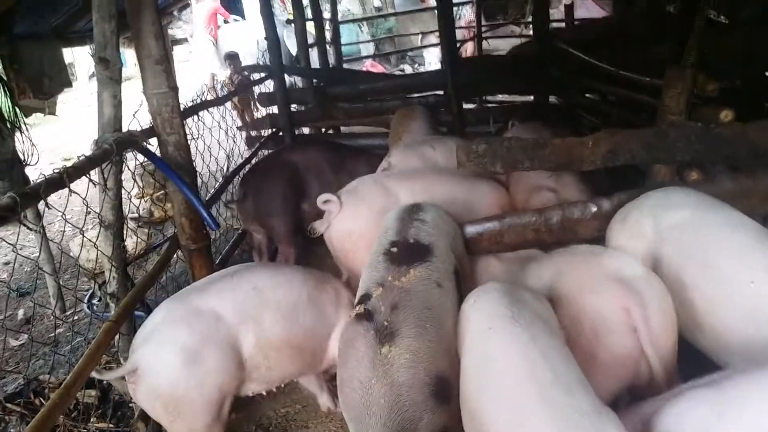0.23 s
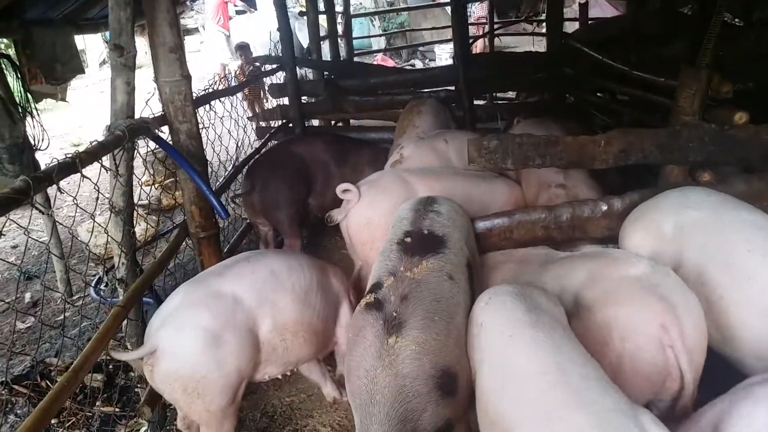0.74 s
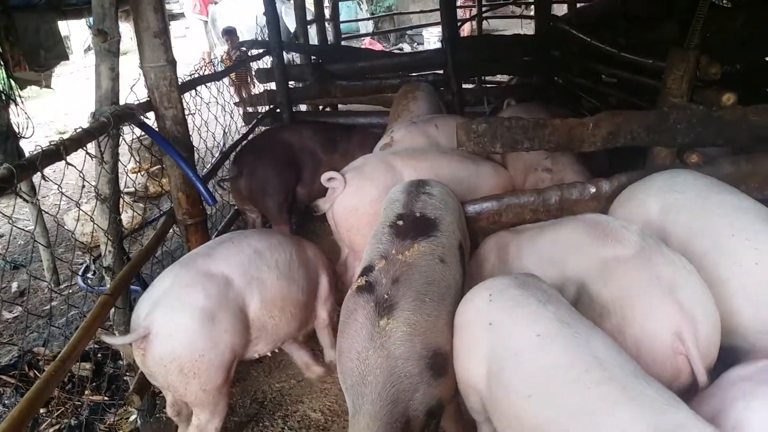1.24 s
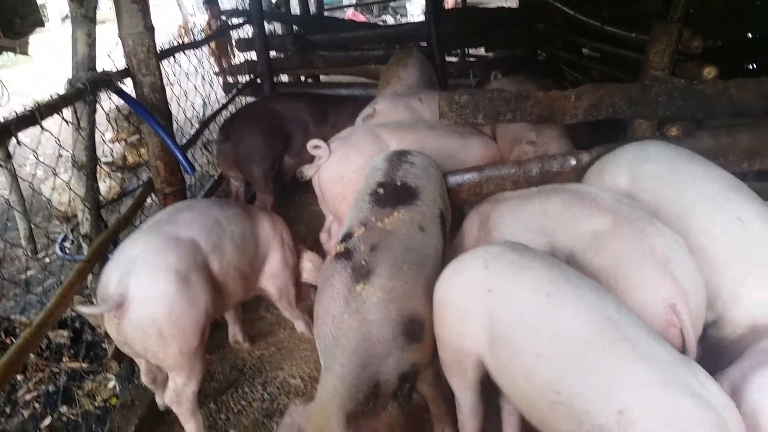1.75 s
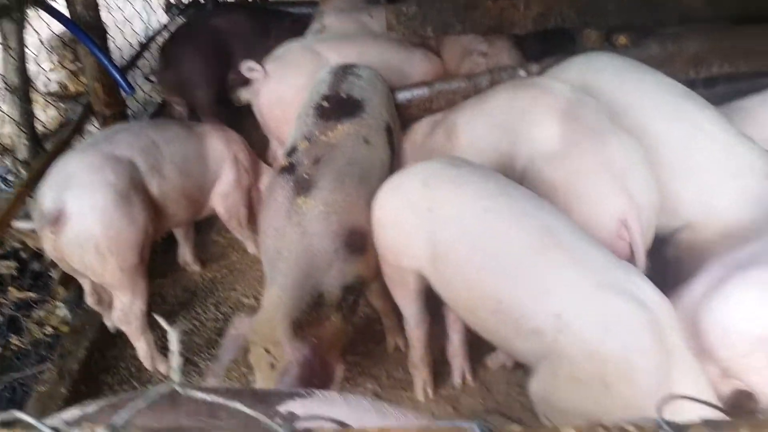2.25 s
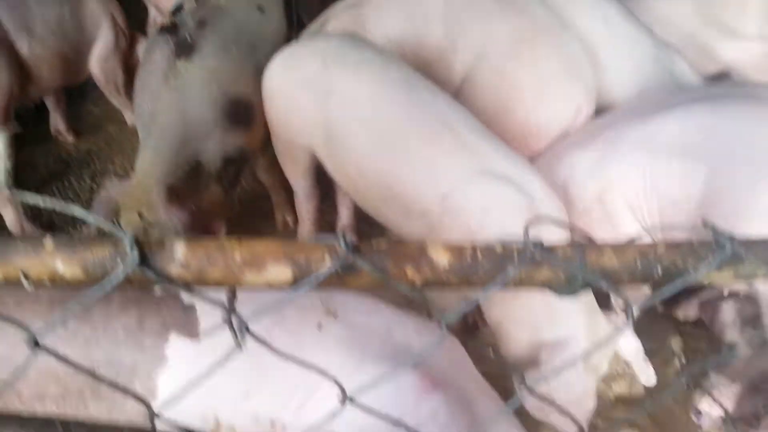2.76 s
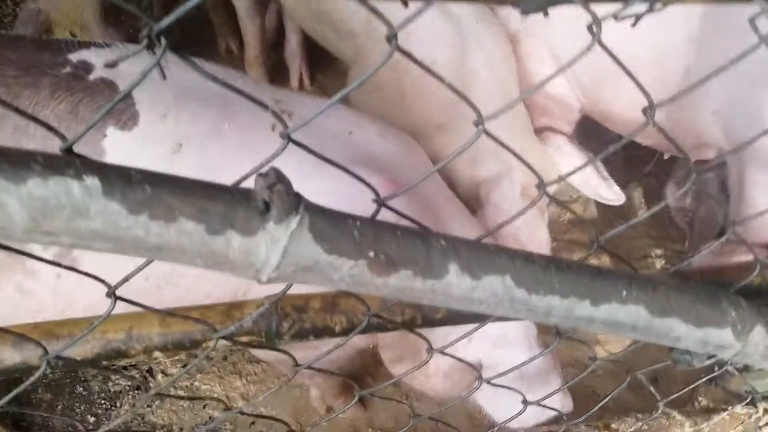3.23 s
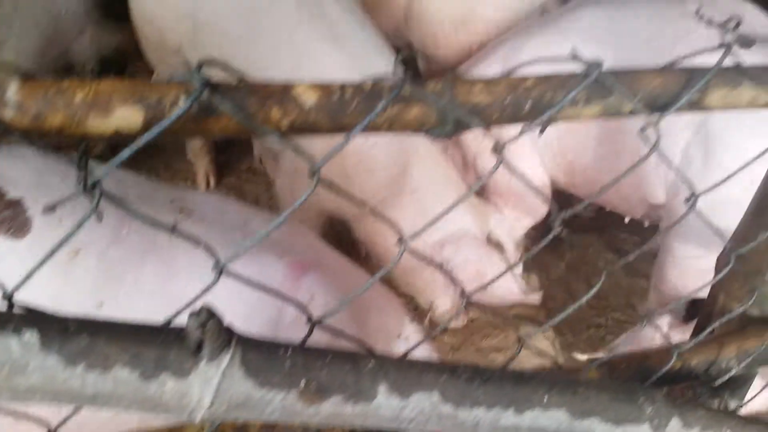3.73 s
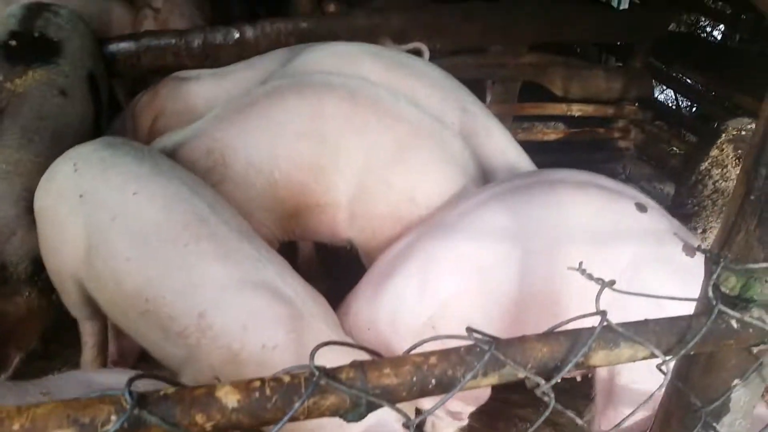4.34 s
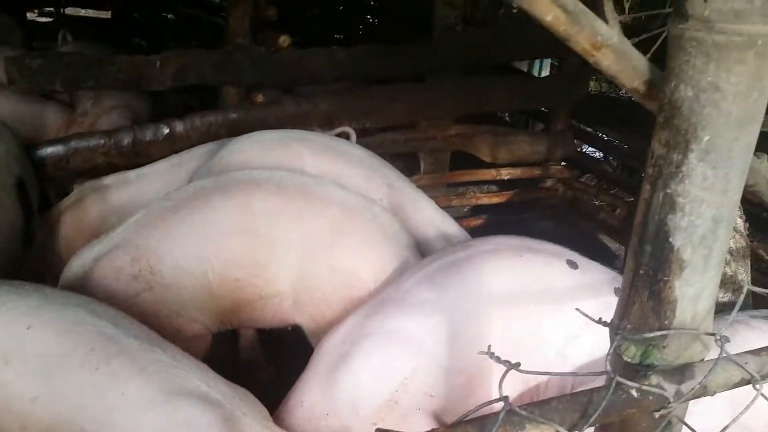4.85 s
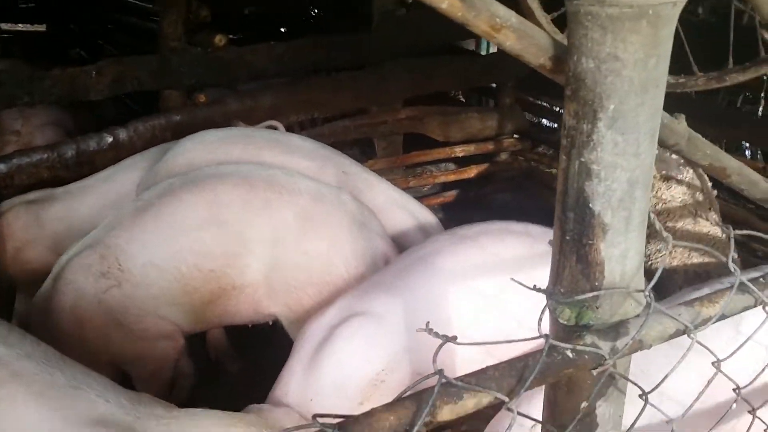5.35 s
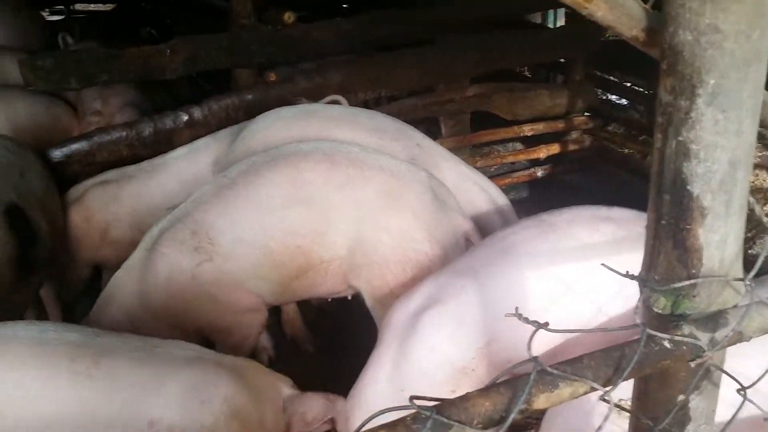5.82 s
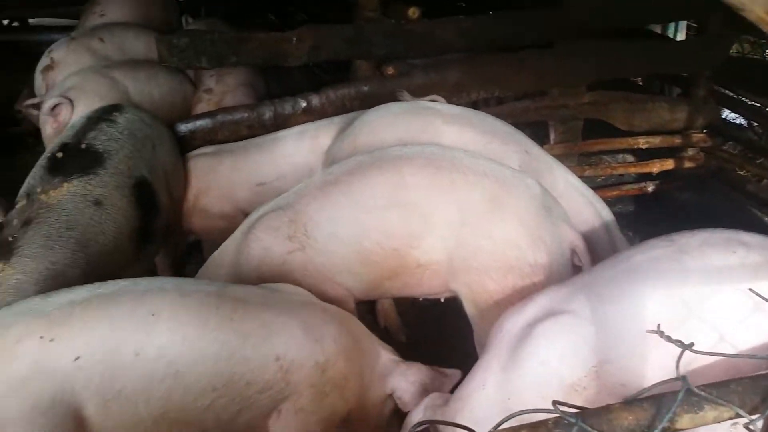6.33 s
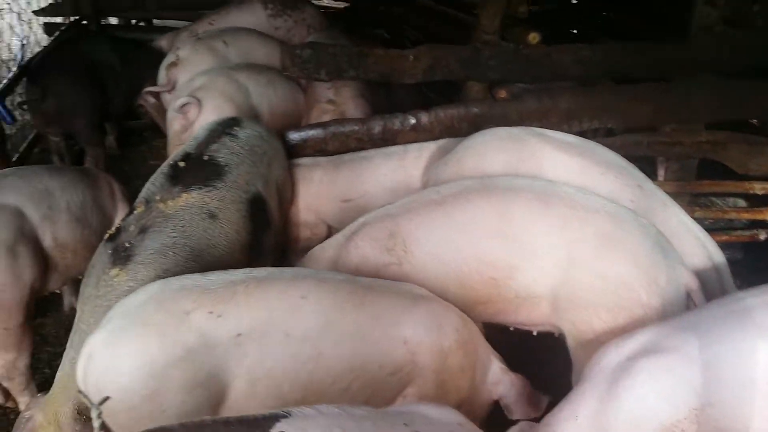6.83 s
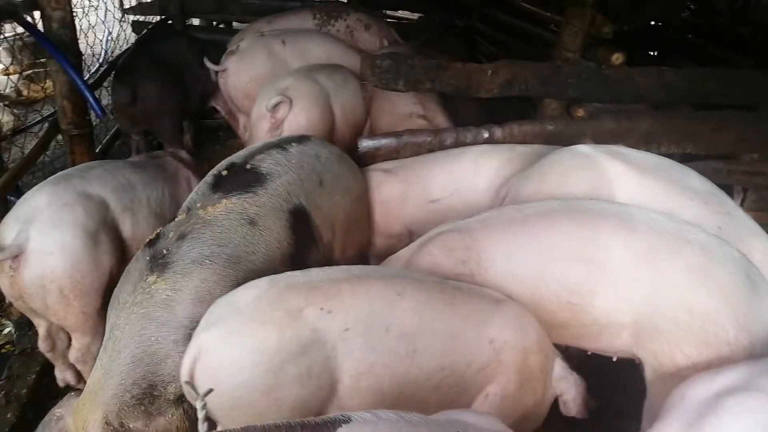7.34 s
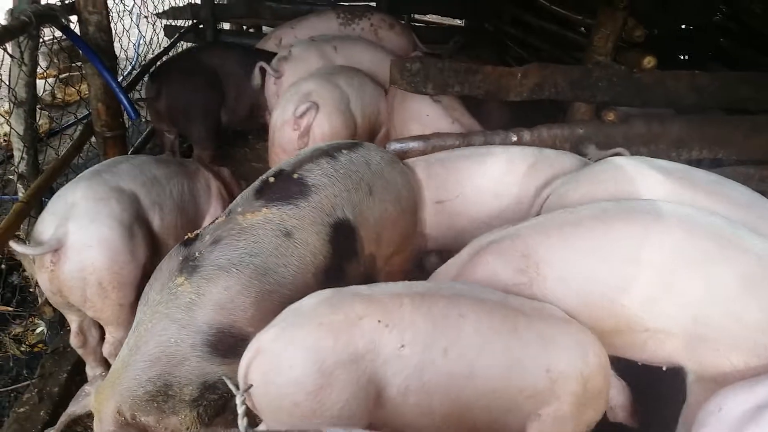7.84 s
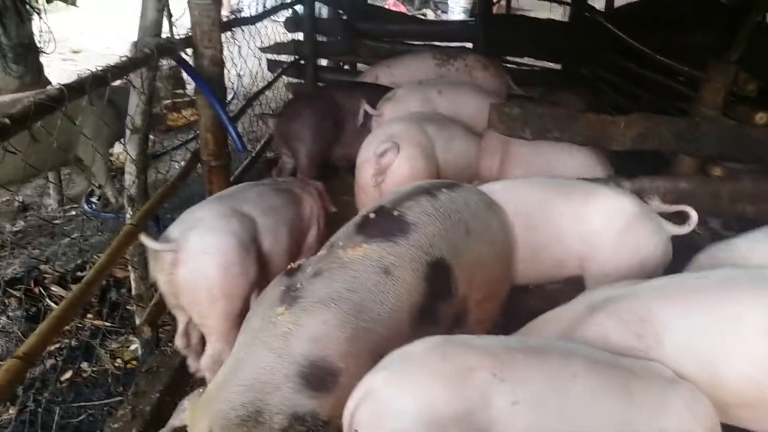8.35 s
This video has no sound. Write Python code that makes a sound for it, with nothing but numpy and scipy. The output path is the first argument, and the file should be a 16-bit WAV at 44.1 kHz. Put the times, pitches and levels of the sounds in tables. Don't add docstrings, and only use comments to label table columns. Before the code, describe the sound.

Pigs crowding a farm pen mutter and chew; a near pig grunts, growls, then squeals harshly, squeals again briefly, and ends with a slack growl.

```python
import sys
import numpy as np
from scipy import signal
from scipy.fft import rfft, irfft, next_fast_len
from scipy.io import wavfile
from scipy.ndimage import uniform_filter1d, map_coordinates

SR = 44100
rng = np.random.default_rng(int(sys.argv[2]) if len(sys.argv) > 2 else 0)


def transcribe(signal):
    frames = np.atleast_2d(signal).T
    limited = np.clip(frames, -1, 1)
    pcm = np.round(limited * 32767).astype(np.int16)
    wavfile.write(sys.argv[1], SR, pcm)


def makeup_ratio(level_db):
    decades = np.asarray(level_db, float) / 20
    return 10 ** decades


N = 378378

# (time [s], unrest [dB])
HERD_UNREST = [
    (0, -0.5),
    (3.3, -1),
    (5.6, 0.5),
    (7.1, 1),
    (8.58, -2),
]
# (frequency [Hz], density [dB per Hz])
MUTTER_SPECTRUM = [(18, -55), (30, -49), (75, -5), (155, 1), (244, 1), (296, -10), (343, -12), (388, -11),
                   (450, -21), (580, -41), (990, -120)]
SHUFFLE_SPECTRUM = [(210, -2.5), (350, -1.5), (389, -17.5), (520, -1), (585, -5.5), (896, -5), (1180, -4),
                    (1420, -6), (1890, -4.5), (3200, -13), (4500, -21.5), (5850, -21), (9900, -120)]
STRAW_SPECTRUM = [(2350, -103), (4000, -9.5), (4410, -7.5), (4910, -12), (5890, -6), (7270, 3.5),
                  (8630, -8), (10000, -14.5), (14900, -21), (15600, -5)]
THUMP_SPECTRUM = [(30, -42), (60, 2), (110, -2), (170, -2), (300, -60)]
# (time [s], half length [s], level [dB])
SHOVES = [
    (1.35, 0.091, -40.5),
    (2.93, 0.086, -36),
    (4.397, 0.098, -41),
    (.3, 0.041, -36),
    (5.79, 0.065, -39),
    (7.653, 0.2, -37.5),
    (8.24, 0.19, -41.5),
]
# (time [s], peak level [dB], low part against peak [dB])
SMACKS = [(0.0556, -18.5, -23), (0.2379, -38, -13), (0.2997, -25, -11), (0.507, -27, -22),
          (0.6767, -23, -27), (1.0545, -28, -15), (1.3177, -19.5, -25), (1.758, -29, -11), (1.791, -30, -6),
          (1.92, -27, -12), (2.246, -23, -20), (2.28, -22.5, -16), (2.4029, -23.5, -22),
          (2.524, -39.5, 10.5), (3.032, -40, -12), (3.421, -24, -24), (3.7273, -24, -12), (5.602, -19, -16),
          (5.622, -32, -10), (5.662, -47, 0), (5.735, -37, 7.5), (5.761, -38.5, 8.5), (5.828, -41, 6),
          (0.334, -40, 4), (0.431, -43, 2), (6.098, -18.5, -6), (6.1542, -29, 0), (6.995, -25, -9),
          (7.429, -27, -13), (7.818, -23, -8), (8.15, -39, 4), (8.246, -23.5, -11), (8.303, -24, -18),
          (8.349, -21.5, -12), (8.3886, -26, -7), (8.4115, -22, -14)]

# (time [s], effort [dB], mouth opening [0-1], throat resonance [Hz], snout resonance [Hz])
GRUNTS = [
    [(.44, -39.5, 0.43, 495, 1130), (.485, -29.5, 0.84, 480, 1140), (.53, -36, 0.7, 500, 1210),
     (.57, -63, 0.6, 500, 1200)],
    [(1.275, -39, 0.75, 564, 1130), (1.32, -34.5, 1.01, 597, 1190), (1.39, -30.5, 0.6, 607, 1150),
     (1.45, -32.5, 0.56, 624, 1140), (1.6, -39.5, 0.54, 595, 1180)],
    [(2.19, -39, 0.2, 570, 1110), (2.252, -31, 0.66, 604, 1095), (2.38, -44, 0.54, 610, 1150)],
    [(2.82, -39.5, 0.55, 613, 1180), (2.93, -32.5, 0.42, 670, 1320), (2.994, -23, 0.6, 700, 1325),
     (3.09, -51, 0.6, 730, 1210), (3.23, -47, .1, 786, 1220), (3.36, -60, .1, 786, 1220)],
]
# (time [s], effort [dB], mouth opening [0-1], throat resonance [Hz], snout resonance [Hz])
GROWLS = [
    [(3.39, -45, 0, 714, 1210), (3.44, -34, 0.04, 666, 1250), (3.52, -26, 0.57, 665, 1360),
     (3.668, -32.5, 0.52, 682, 1320), (3.76, -31.5, 0.6, 750, 1240)],
    [(5.7, -41, 0.6, 650, 1430), (5.846, -47, 0.3, 613, 1420), (5.9, -32, 0.38, 630, 1380),
     (6.0, -31.5, 0.56, 650, 1340), (6.025, -29, 0.88, 677, 1320), (6.11, -32.5, 0.96, 638, 1300),
     (6.2, -28.5, 0.7, 650, 1260), (6.3, -45, 0.8, 656, 1276)],
    [(7.31, -58, .1, 640, 1100), (7.36, -28.5, 0.34, 610, 1050), (7.448, -26.5, 0.27, 650, 1220),
     (7.458, -30, 0.74, 650, 1250), (7.525, -29.5, 0.88, 660, 1280), (7.56, -30, 0.58, 686, 1340),
     (7.62, -31, 0.68, 713, 1400), (7.86, -35.5, 0.38, 713, 1300), (7.93, -49, 0.5, 740, 1250)],
]
# (time [s], strength against the usual flap [ratio])
HARD_FLAPS = [(0.457, 0.7), (0.481, 0.8), (0.506, 0.58), (1.284, 1.3), (1.311, 1.4), (1.337, 1.25),
              (1.363, 0.82), (1.41, 1.06), (1.39, 0.55), (1.441, 1.1), (1.462, 1.3), (1.492, 0.67),
              (1.514, .5), (1.542, 0.73), (1.566, .5), (2.942, 0.87), (2.985, 0.56), (3.408, 1),
              (3.435, 1.2), (3.464, 1.2), (3.516, 0.79), (3.593, 0.83), (5.879, 0.67), (5.901, 1.2),
              (5.926, .7), (5.957, 1.26), (5.981, 1.6), (6.023, 0.96), (6.047, 1.6), (6.071, 0.96),
              (6.095, 1.6), (6.168, 1.1), (7.365, 0.86), (7.397, 0.99), (7.424, 0.81), (7.456, 1.4),
              (7.479, .7), (7.503, 0.76), (7.525, 0.61), (7.549, .9), (7.574, 1), (7.6, 1.1), (7.625, 0.68),
              (7.653, 0.93), (7.675, 1.2), (7.696, 1.16), (7.722, 0.99), (7.748, 0.91)]
# (time [s], side pocket [Hz], its level against the snout [dB], mouth [Hz], mouth level [dB])
MOUTH_SHAPE = [(.47, 1400, 0, 2880, -9), (.52, 1580, -1, 2870, -6), (1.31, 1317, -5, 2300, -5),
               (1.38, 1340, -14, 2350, -7), (1.5, 1400, -18, 2400, -11), (2.25, 1430, -2, 2300, -4),
               (2.98, 1550, -13, 2320, -6), (3.52, 1480, -7, 2190, -3), (3.7, 1550, -3, 2180, -11),
               (5.75, 1480, 2, 2420, 4), (5.95, 1480, 4, 2200, -3.5), (6.05, 1480, 7, 2140, -1),
               (6.12, 1481, 4, 2140, -2), (6.25, 1490, 5, 2200, -3), (7.38, 1908, 2, 2049, -1),
               (7.46, 1020, -4, 2580, 2), (7.5, 1040, -8, 2090, -1), (7.58, 1050, -4, 2150, 0),
               (7.65, 1150, -11, 2250, -2), (7.85, 1140, -2, 2320, 2)]
# (time [s], steady air against the jets [ratio])
LEAK = [(0.5, 0.36), (1.3, .2), (1.5, 0.12), (3, 0.27), (3.6, 0.34), (6.0, .1), (6.12, .2), (6.2, 0.78),
        (7.35, 1), (7.41, 0.26), (7.5, 1.4), (7.6, 0.79), (7.9, 0.51)]

# (time [s], pitch [Hz], level [dB], pressing: octave over fundamental [dB],
# buzz of the upper partials [dB])
HUM_FIRST = [
    (3.7, 299, -44, -8, -50),
    (3.745, 305.2, -24.5, -15, -46),
    (3.92, 306.9, -21.5, -16, -43),
    (4.02, 314, -28.5, -13, -45),
    (4.18, 336, -31.5, 3.5, -70),
    (4.5, 337, -30.5, -4, -47),
    (5.04, 344, -47.5, 15, -55),
    (5.2, 340, -51.5, 15, -52),
    (5.42, 325, -46, -1, -55),
]
HUM_SECOND = [
    (6.24, 320, -49.5, 6.3, -48),
    (6.28, 331.5, -47.5, 23, -55),
    (6.5, 337.2, -48.5, 6.4, -58),
    (6.7, 350.4, -35.5, 4.6, -55),
    (6.779, 344.5, -36.5, 6.4, -48.5),
    (6.88, 321.8, -41, 4.4, -52),
    (6.92, 315.3, -47, 11.3, -52),
]
BUZZ_PARTIALS = [1.5, -0.5, -24, -4, 6, -12, -11]
# (time [s], pitch [Hz], level [dB], brightness: octave over
# fundamental [dB], coupling to the hum [dB])
HIGH_FIRST = [
    (4.04, 1215, -32, -1, -46),
    (4.09, 1214, -28, -3, -50),
    (4.13, 1086, -35, 6.5, -56),
    (4.23, 1202, -23, -6, -55),
    (4.32, 1214, -24, 1.5, -49),
    (4.35, 1295, -22, -4, -46),
    (4.46, 1343, -17, -12, -48),
              (4.5, 1263, -34.5, 13, -33), (4.54, 1239, -37, 8.5, -32), (4.619, 1192, -43, 11, -30),
                (4.69, 1210, -37.5, 6.5, -28), (4.77, 1193, -36, 5, -29), (4.84, 1185, -43, 9, -38),
                (4.87, 1195, -46, 10, -26), (4.93, 1147, -39, 4, -37), (4.98, 1195, -49, 4, -44),
                (5.08, 1242, -31, -3, -29), (5.14, 1210, -40.5, 1, -36), (5.18, 1205, -39, 3, -24.5),
                (5.219, 1177, -41, 8, -30), (5.255, 1163, -42, 16, -32.5), (5.3, 1138, -46, -12, -33),
                (5.36, 1074, -40, -4, -42), (5.432, 1100, -33.5, 9.5, -28.5), (5.469, 1092, -52, -2, -38)]
HIGH_SECOND = [
    (6.17, 1270, -46, 2, -60),
    (6.25, 1245, -34, -5, -48),
    (6.3, 1215, -36, 1, -39),
    (6.36, 1160, -35.5, 12, -41),
               (6.39, 1128, -26.5, -1, -24), (6.44, 1208, -21, 1, -34), (6.47, 1220, -27, -6, -27),
                 (6.515, 1196, -34, 13, -30), (6.544, 1156, -37, 8, -32), (6.585, 1193, -25, 3.5, -32),
                 (6.622, 1242, -19.5, -8.5, -28), (6.7, 1240, -30.5, -5, -31), (6.756, 1203, -30.5, 2, -25),
                 (6.79, 1138, -32, 4, -36), (6.84, 1061, -32.5, 0, -29), (6.89, 1058, -42, 4, -32),
                 (6.93, 1020, -54, 2, -49)]
# (time [s], level [dB], level of its octave [dB])
DIFFERENCE = [(4.04, -66, -63), (4.5, -62, -56), (4.6, -40, -48), (4.74, -42, -48), (4.9, -38.5, -37),
              (5.08, -37, -32), (5.15, -35, -41), (5.19, -48, -46), (5.23, -30.5, -40), (5.31, -31.5, -39),
              (5.38, -52, -38), (5.47, -45, -50), (6.2, -47, -55), (6.6, -50, -52), (6.8, -42, -46),
              (6.86, -42, -46), (6.91, -32, -46), (6.93, -42, -50)]
# (time [s], breath [dB], bite: hiss over the breath [dB])
RASP = [
    [(3.62, -48, -10), (3.72, -37, -1), (3.78, -34.5, 6.5), (3.88, -38.5, 0.5), (4.08, -36, 4),
     (4.35, -34.5, 5.5), (4.55, -34, 6.5), (4.77, -36.5, 9.5), (4.95, -38, 10), (5.12, -34.5, 8.5),
     (5.3, -36, 7), (5.43, -35, 9.5), (5.49, -48, 4), (5.52, -52, 7)],
    [(6.15, -36, -13), (6.22, -31.5, -5), (6.258, -27.5, -3), (6.35, -32.5, 2), (6.45, -34, 9),
     (6.644, -32, 4.5), (6.76, -30, 6), (6.88, -30, 5), (6.92, -43, -5), (6.975, -78, -10.5)],
]
# (centre [Hz], width [Hz], level [dB])
THROAT_MODES = [(652, 61, 4), (757, 114, 4), (1240, 235, 3), (1547, 170, 5), (2140, 115, 1.5),
                (2530, 160, 2.5), (2705, 190, 3.5), (3180, 340, -2), (3840, 100, -5)]
# (frequency [Hz], density [dB per Hz])
EDGE_SPECTRUM = [(1940, -24), (3300, -4.5), (3640, 0), (4250, -6.5), (4810, -6), (5200, -5.5), (5620, -5.5),
                 (6570, -2.5), (7580, 2.5), (10200, -17.5), (14100, -29), (15600, -45)]

# (frequency [Hz], level against direct sound [dB])
SCATTER = [(200, -16), (700, -7), (1500, -2), (2600, 2), (4000, 8), (7000, 13)]
# (frequency [Hz], correlation [-1 to 1])
PORT_LIKENESS = [(60, 1), (130, 0.91), (290, 0.95), (640, 0.66), (1410, 0.039), (3100, 0.081),
                 (6820, -0.51), (15000, 0.21)]
# (frequency [Hz], left minus right [dB])
PORT_COLOUR = [(60, -12), (92, 0.5), (140, -3.5), (210, -1.5), (330, -4), (500, -0.5), (770, -1),
               (1170, 2.5), (1790, 5.5), (2740, 4.5), (4190, 0), (6410, 18), (9810, 25), (15000, 16.5)]


def unit(x):
    return x / np.sqrt(np.mean(x ** 2) + 1e-20)


def along(points, hz):
    f, v = np.transpose(points)
    return np.interp(np.log(hz + 1), np.log(f + 1), v)


def curves(*calls):
    t = np.arange(N) / SR
    gate = sum(np.clip(np.minimum(t - c[0][0], c[-1][0] - t) / 0.0041, 0, 1) for c in calls)
    s, *columns = np.transpose(np.vstack(calls))
    return [gate] + [np.interp(t, s, column) for column in columns]


def wobble(rate):
    knots = rng.standard_normal(int(N * rate / SR) + 4)
    return map_coordinates(knots, [np.arange(N) * rate / SR])


def filtered(x, response):
    m = next_fast_len(N + 8192)
    return irfft(rfft(x, m) * response(np.fft.rfftfreq(m, 1 / SR)), m)[..., :N]


def turns(hz):
    return 2 * np.pi * np.cumsum(hz * np.ones(N)) / SR


def cavity(x, hz, width_hz):
    spin = np.exp(1j * turns(hz))
    keep = np.exp(-np.pi * width_hz / SR)
    soft = signal.lfilter([1], [1, -keep ** 3], x / spin)
    return unit((signal.lfilter([1], [1, -keep], soft) * spin).real)


def mode(f, hz, width_hz):
    return 1j * f * width_hz / (hz * hz - f * f + 1j * f * width_hz)


def tube(modes):
    return lambda f: sum((-1) ** k * makeup_ratio(db) * mode(f, hz, width_hz)
                         for k, (hz, width_hz, db) in enumerate(modes)) ** 2


def rush(spectrum, patchy_db):
    z = signal.stft(rng.standard_normal((2, N + 512)), nperseg=512)[2]
    patches = uniform_filter1d(rng.standard_normal(z.shape[1:]), size=6, axis=0)
    patches = uniform_filter1d(patches, size=8, axis=1)
    pair = signal.istft(z * makeup_ratio(patchy_db * unit(patches)), nperseg=512)[1][:, :N]

    def mid_side(f):
        angle = np.arccos(np.clip(along(PORT_LIKENESS, f), 0, 1)) / 2
        return makeup_ratio(along(spectrum, f)) * np.array([np.cos(angle), np.sin(angle)])

    mid, side = filtered(pair, mid_side)
    return unit(np.array([mid + side, mid - side]))


def thumps():
    t = np.arange(N) / SR
    lean = sum(makeup_ratio(db) * np.exp(-((t - s) / half_s) ** 2) for s, half_s, db in SHOVES)
    return lean * unit(filtered(rng.standard_normal(N), lambda f: makeup_ratio(along(THUMP_SPECTRUM, f))))


def herd():
    _, unrest_db = curves(HERD_UNREST)
    stir = wobble(5.8)
    mutter_db = -38.5 + unrest_db + 1.05 * wobble(17) + 1.2 * wobble(40)
    shuffle_db = -36 - 0.63 * unrest_db + 0.6 * stir + 0.9 * wobble(20)
    straw_db = -59.5 + 0.5 * unrest_db + 19.5 + 0.4 * stir + 0.84 * wobble(16)
    mutter = makeup_ratio(mutter_db) * rush(MUTTER_SPECTRUM, patchy_db=0.0)
    shuffle = makeup_ratio(shuffle_db) * rush(SHUFFLE_SPECTRUM, patchy_db=1.3)
    straw = makeup_ratio(straw_db) * rush(STRAW_SPECTRUM, patchy_db=2.5)
    return thumps() + mutter + shuffle + straw


def smacks():
    t = np.arange(SR // 20) / SR
    high, low = np.zeros((2, N + SR))
    decay = makeup_ratio(-60 * t / 0.0089) + 0.46 * makeup_ratio(-60 * t / 0.031)
    for s, db, low_db in SMACKS:
        burst = decay * rng.standard_normal(len(t))
        high[round(s * SR):][:len(t)] += makeup_ratio(db) * burst
        low[round(s * SR):][:len(t)] += makeup_ratio(db + low_db) * burst

    def sprinkle(per_s, floor_db, spread_db, decay):
        level_db = floor_db + spread_db * rng.exponential(size=N).clip(0, 1.9)
        hits = (rng.random(N) < per_s / SR) * makeup_ratio(level_db)
        return signal.fftconvolve(hits, decay)[:N] * rng.standard_normal(N)

    high = high[:N] + sprinkle(45, -39, 7.2, makeup_ratio(-60 * t[:600] / 0.011))
    low = low[:N] + sprinkle(22, -53, 7.4, makeup_ratio(-60 * t / 0.055))
    bright = filtered(high, lambda f: makeup_ratio(along(STRAW_SPECTRUM, f) + 4.5))
    return bright + filtered(low, lambda f: makeup_ratio(8.5) * mode(f, 2300, 2200))


def fold_flaps():
    gather_s = 0.012
    cycle = np.cumsum(41 * makeup_ratio(1.1 * wobble(30))) / SR
    usual = np.diff(np.floor(cycle), prepend=0) * makeup_ratio(0.19 * wobble(88))
    s, strength = np.transpose(HARD_FLAPS)
    hard = np.bincount(np.round(s * SR).astype(int), strength, N)
    clear = uniform_filter1d(1. * (hard > 0), size=int(2 * gather_s * SR)) < 1e-6
    return hard + usual * clear


def grunts():
    gate, chest_db, opening, throat_hz, snout_hz = curves(*GRUNTS, *GROWLS)
    _, side_hz, side_db, mouth_hz, shape_db = curves(MOUTH_SHAPE)
    _, leak = curves(LEAK)
    tightened_hz = np.maximum(throat_hz - 650, -34.7)
    chest_hz = 279 + 0.061 * tightened_hz
    throat_db = chest_db - 6.5 + 0.1216 * tightened_hz
    snout_db = chest_db - 14.5 + 25.5 * opening
    mouth_db = chest_db - 12.5 + 16 * opening + 0.0474 * tightened_hz + shape_db

    flaps = fold_flaps()

    def puff(fade_s):
        envelope = signal.lfilter([1], [1, -np.exp(-1 / (fade_s * SR))], flaps)
        return unit(envelope * rng.standard_normal(N))

    jet, sigh = puff(0.015), puff(0.04)
    steady = leak * rng.standard_normal(N)
    jet = (jet + steady) / np.sqrt(1 + leak ** 2)
    sigh = sigh + steady
    flaps = unit(flaps)

    def blown(air):
        return unit(flaps + air * jet)

    chest = makeup_ratio(chest_db) * cavity(flaps + 0.55 * sigh, chest_hz, 48)
    throat = makeup_ratio(throat_db) * cavity(flaps + 0.8 * sigh, throat_hz, 45)
    pocket = makeup_ratio(side_db) * cavity(blown(1.7), side_hz, 91)
    snout = cavity(blown(2.6), snout_hz, 123) + pocket
    snout = makeup_ratio(snout_db) * snout / np.sqrt(1 + makeup_ratio(2 * side_db))
    mouth = cavity(blown(4.5), mouth_hz, 200)
    mouth = mouth + 0.92 * cavity(blown(0.52), 2744, 240) + 0.23 * cavity(blown(2.9), 3440, 700)
    mouth = makeup_ratio(mouth_db) * unit(mouth)
    hiss = unit(filtered(jet, lambda f: makeup_ratio(along(EDGE_SPECTRUM, f))))
    return gate * (chest + throat + snout + mouth + makeup_ratio(mouth_db - 10) * hiss)


def rasp(tight, low, high, beat, hum_hz, shriek_hz):
    blowing, middle_db, bite_db = curves(*RASP)
    pulse = makeup_ratio(1.6 * wobble(25)) * (1 + 0.94 * np.cos(low / 2))
    deep, mid, sharp = pulse * rng.standard_normal((3, N))
    body = makeup_ratio(middle_db - 15 + 17) * unit(filtered(deep, tube(THROAT_MODES[:4])))
    riding = cavity(mid, 2 * shriek_hz, 150) + 0.75 * cavity(mid, 3 * shriek_hz, 280)
    riding = riding + 0.49 * cavity(mid, 2 * shriek_hz + hum_hz, 110)
    still = (1 - 0.65 * tight) * unit(filtered(mid, tube(THROAT_MODES[4:])))
    middle = makeup_ratio(middle_db + 9.0) * (still + 0.4 * tight * riding)
    snaps = sum(np.cos(k * high) for k in range(3, 8))
    jets = tight * beat * unit(snaps * (2.7 + wobble(220)))
    edge = unit(filtered(sharp + 0.7 * jets, lambda f: makeup_ratio(along(EDGE_SPECTRUM, f))))
    return blowing * (body + middle + makeup_ratio(middle_db + bite_db - 0.7) * edge)


def squeals():
    tight, shriek_hz, first_db, bright_db, sum_db = curves(HIGH_FIRST,
                                                         HIGH_SECOND)
    on, hum_hz, hum_db, pressing_db, buzz_db = curves(HUM_FIRST, HUM_SECOND)
    _, gap_db, octave_db = curves(DIFFERENCE)
    rough = np.clip(0.4 + 0.06 * (-24 - first_db), 0.4, 1)

    def tone(db, phase, flutter_db):
        return np.sqrt(2) * makeup_ratio(db + flutter_db * rough * wobble(55)) * np.sin(phase)

    low = turns(hum_hz * (1 + 0.01093 * wobble(60)))
    octave = hum_db + pressing_db
    fourth_db = octave - 5.5 - 14 * (1 - rough)
    hum = tone(hum_db, low, 1.0) + tone(octave, 2 * low, 0.53) + tone(fourth_db, 4 * low, 4.3)
    hum = hum + sum(tone(buzz_db + db, k * low, 5.5) for k, db in enumerate(BUZZ_PARTIALS, start=4))

    high = turns(shriek_hz * (1 + 0.017 * rough * wobble(110)))
    beat = 1 + 0.7 * np.cos(low) + 0.7 * rough * np.cos(low / 2)
    second_db = first_db + bright_db
    third_db = second_db - 25.5
    upper = tone(second_db - 7, 2 * high, 4.5) + tone(third_db, 3 * high, 5)
    upper = upper + tone(third_db - 5, 4 * high, 5) + tone(third_db - 6, 5 * high, 5)
    shriek = tone(first_db, high, 3) + tone(second_db - 2.5 * rough, 2 * high, 4) + beat * upper

    total = turns((shriek_hz + hum_hz) * (1 + 0.011 * wobble(110)))
    gap = turns((shriek_hz - hum_hz) * (1 + 0.012 * wobble(70)))
    sum_tone = np.sqrt(np.abs(beat)) * tone(sum_db, total, 3)
    difference_tone = tone(gap_db, gap, 2.5) + tone(octave_db, 2 * gap, 4)
    voices = on * hum + tight * (shriek + sum_tone + difference_tone)
    return voices + rasp(tight, low, high, beat, hum_hz, shriek_hz)


def placed(x, lag_s, t60):
    hop, t = SR // 5, np.arange(SR // 8) / SR
    wet, padded = np.zeros((2, N + SR)), np.pad(x, (hop, SR))
    fade = np.sin(np.pi * np.arange(2 * hop) / (2 * hop))
    for at in range(0, N + hop, hop):
        tail = makeup_ratio(-60 * t / t60) * rng.standard_normal((2, len(t)))
        tail = tail / np.linalg.norm(tail[0])
        piece = padded[at:at + 2 * hop] * fade
        wet[:, at:at + 2 * hop + len(t) - 1] += signal.fftconvolve(piece[None], tail, axes=1)

    def share(f):
        return 1 / np.sqrt(1 + makeup_ratio(2 * along(SCATTER, f)))

    lags = lag_s * np.array([[0], [1]])
    direct = filtered(x, lambda f: share(f) * np.exp(-2j * np.pi * f * lags))
    return direct + filtered(wet[:, hop:hop + N], lambda f: np.sqrt(1 - share(f) ** 2))


def scene():
    ticks = placed(smacks(), lag_s=0.00005, t60=0.11)
    voice = placed(grunts() + squeals(), lag_s=0.00013, t60=0.16)
    return herd() + ticks + voice


def low_pass(x):
    return signal.sosfilt(signal.butter(12, 15600, fs=SR, output="sos"), x)


def record(dry):
    def response(f):
        ratio = makeup_ratio(along(PORT_COLOUR, f))
        colour = np.sqrt(2 / (1 + ratio ** 2)) * np.array([ratio, np.ones_like(f)])
        return colour * (f < 15700) / (1 + (45 / (f + 1)) ** 3)

    return low_pass(filtered(dry, response))


dry = scene()
out = record(dry)
transcribe(out)
```